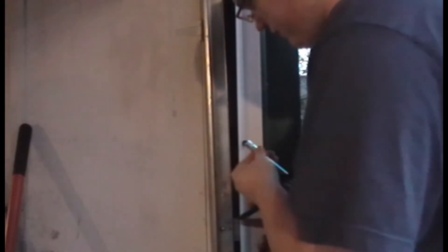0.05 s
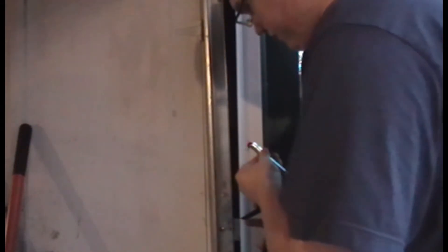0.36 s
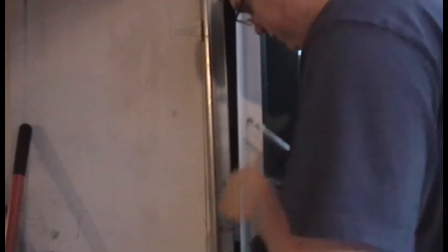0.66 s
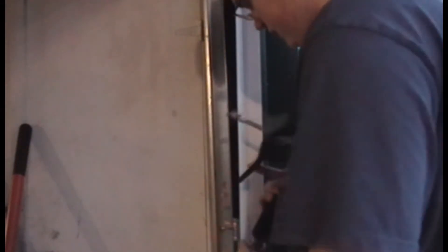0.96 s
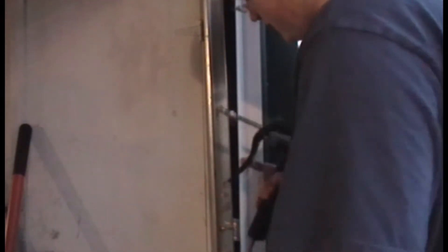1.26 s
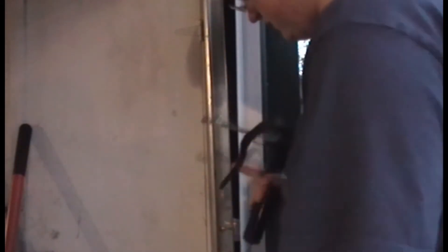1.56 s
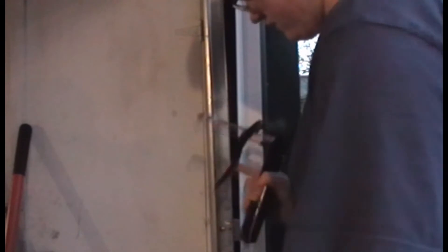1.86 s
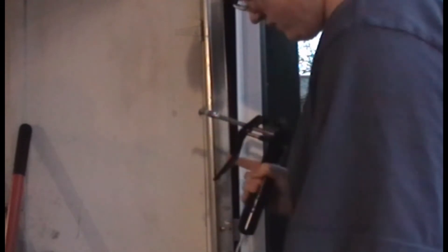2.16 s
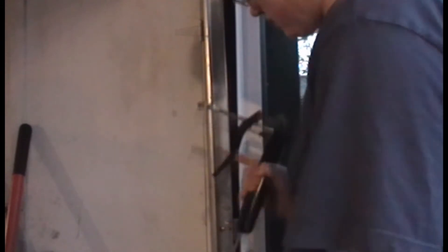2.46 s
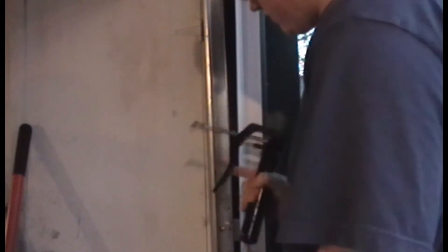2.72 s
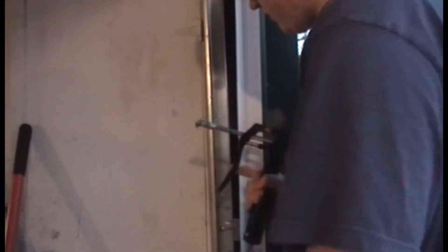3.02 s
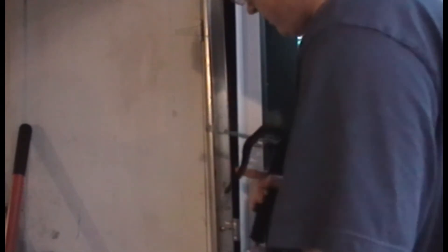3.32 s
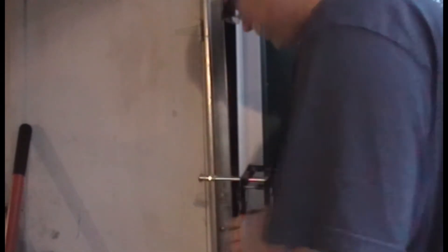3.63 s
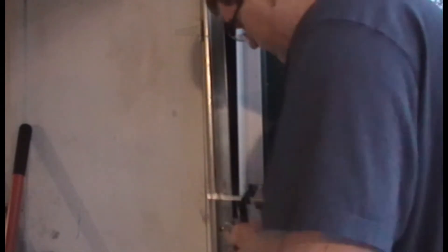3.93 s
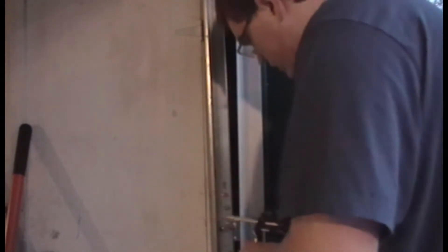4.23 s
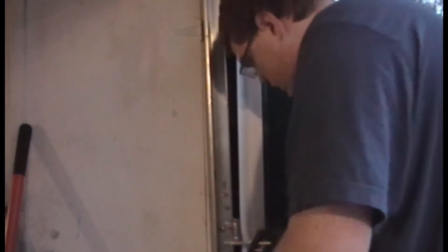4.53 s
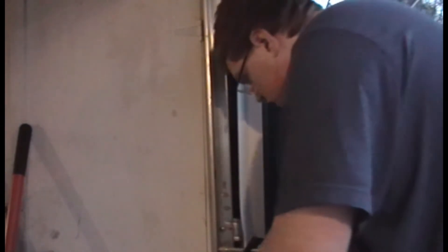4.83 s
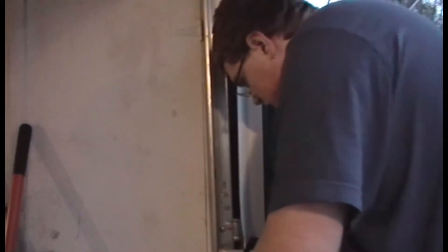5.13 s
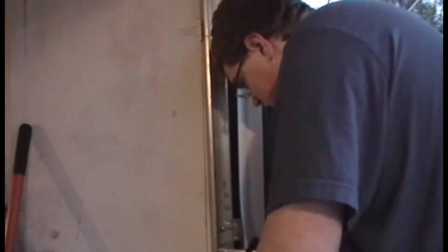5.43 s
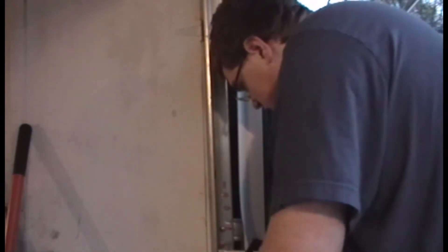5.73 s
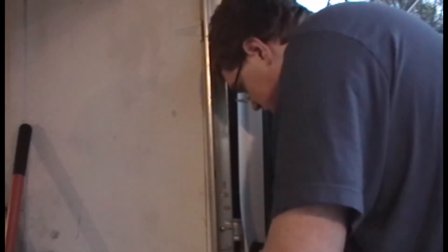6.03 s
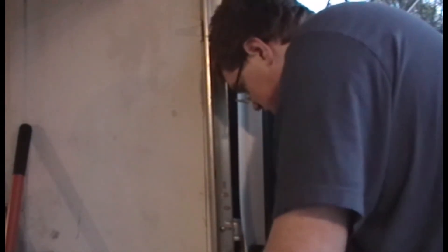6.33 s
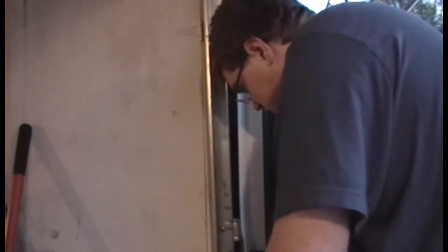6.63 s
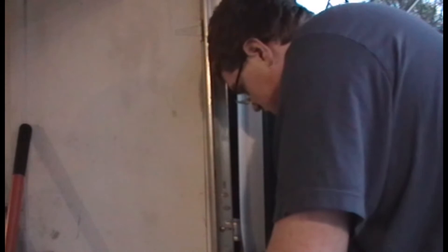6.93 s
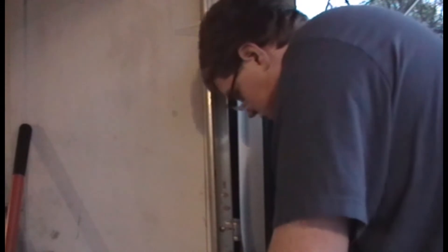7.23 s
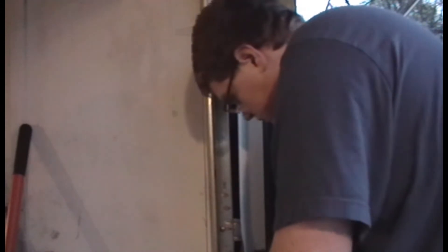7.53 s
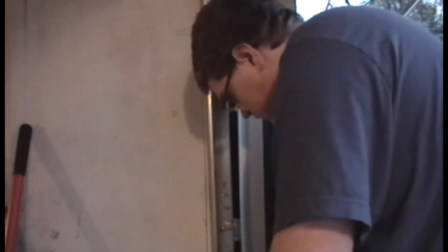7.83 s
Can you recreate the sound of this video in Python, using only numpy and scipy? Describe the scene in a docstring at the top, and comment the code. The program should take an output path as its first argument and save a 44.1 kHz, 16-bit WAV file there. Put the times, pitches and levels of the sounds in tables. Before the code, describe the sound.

A low, slightly wavering hum with a thin hiss fills a garage throughout. Just before 1 second a hand grease gun gives two faint ticks. From 1.2 to 3.3 seconds it is pumped about ten times, faster in the second half: each squeeze is a short spring scrape, a dull piston knock and a sharp steel click. The loudest clicks fall near 1.6, 2.6, 2.9 and 3.3 seconds. At 3.7 seconds a hand slides softly along the barrel. From 4 to about 7.5 seconds the nozzle rubs quietly in short turns on a door hinge. It knocks and rattles there at 4.7 seconds, several times more lightly between 5.3 and 6.5, and hardest at 6.9, briefly ringing the steel track. These knocks are softer than the clicks. The tool sounds are fairly close, with a short echo. A bird outside chirps faintly now and then.

```python
"""A low hum fills a garage throughout; a bird chirps faintly outside now and then.
From 0.8 s a pistol-grip grease gun clicks and is pumped: each squeeze scrapes its spring,
knocks the piston and ends in a sharp steel click. At 3.7 s a hand slides along the barrel.
From 4 s the lowered nozzle rubs, then knocks and rattles, on a hinge by the steel door track."""
import sys
import numpy as np
from scipy import signal
from scipy.fft import rfft, irfft, next_fast_len
from scipy.io import wavfile
from scipy.ndimage import uniform_filter1d, minimum_filter1d, map_coordinates

SR = 44100
rng = np.random.default_rng(int(sys.argv[2]) if len(sys.argv) > 2 else 0)


def master_out(mix):
    """Clip the mix to full scale and print it as 16-bit PCM to the path in sys.argv[1]."""
    frames = np.transpose(np.atleast_2d(mix))
    ceiling = np.clip(frames, -1, 1)
    pcm = np.round(ceiling * 32767).astype(np.int16)
    wavfile.write(sys.argv[1], SR, pcm)


N = 347067

# Levels are relative. Hum envelope: t/s, low band/dB, upper band/dB
HUM_LEVELS = [(0, -18.5, -26.5), (.6, -15.5, -25.5), (1.15, -18, -23), (1.4, -22, -28.5),
              (2.55, -21.5, -26), (2.72, -19, -27.5), (3.45, -25, -31), (4.0, -18, -22.5), (4.85, -17, -25),
              (5.1, -22, -26.5), (5.65, -20.5, -28), (6.5, -16.5, -24), (7.07, -21, -30.5),
              (7.3, -17.5, -28), (7.87, -21.5, -28)]
# tones in the hum: f/Hz, level against their band/dB
HUM_TONES = [(93, -21), (167, -11.5), (284, -11.5)]
# hiss envelope: t/s, level/dB
HISS_LEVELS = [(0, -50), (1.15, -49), (1.4, -53), (3.5, -53), (4.0, -48), (6.8, -49.5), (7.15, -55.5),
               (7.87, -53.5)]
# bird calls: t/s, f/Hz, level/dB
CHIRPS = [(.07, 3860, -48), (1.02, 3750, -46), (3.94, 3920, -42), (6.229, 3950, -38.5), (7.48, 3830, -44),
          (7.57, 3780, -46), (7.70, 3790, -51)]
# lever snaps: t/s, level/dB, treble/dB, body/dB
LEVER_SNAPS = [(.800, -41.5, -16, -5), (0.921, -34.5, -23, 9.5), (1.2513, -16, 16.5, -17),
               (1.281, -29, -3.5, 15), (1.6084, -0.5, -2.5, -6), (1.9106, -17, 9, -5),
               (1.932, -13.5, -5.5, 2), (2.333, -5.5, -5.5, -6), (2.4737, -11, 5, -2),
               (2.5, -22.5, -12.5, 12.5), (2.62, 1, 3, -4), (2.8036, -20.5, 9.5, 7), (2.825, -13, -8.5, -5),
               (2.9391, 0, 1, -5), (3.1249, -21, 6.5, -1), (3.1414, -20.5, -4.5, 1), (3.268, 2.5, -2.5, -8)]
# lever squeezes: top-speed t/s, rise/s, level/dB, top-speed resonance f/Hz
STROKES = [(1.23, 0.08, -19.5, 3220), (1.561, 0.093, -25.5, 3074), (1.882, 0.08, -22, 3200),
           (2.28, 0.069, -20, 3206), (2.448, 0.061, -18.5, 3340), (2.592, 0.064, -20.5, 3450),
           (2.775, 0.074, -21, 3490), (2.903, 0.052, -22, 3180), (3.092, 0.074, -25.5, 3027),
           (3.238, 0.064, -22.5, 3370)]
# nozzle turns: hardest t/s, length/s, level/dB
NOZZLE_TURNS = [(4.056, 0.065, -43.5), (5.1, 0.156, -54.5), (5.263, 0.085, -41), (5.454, 0.027, -45),
                (5.878, 0.15, -47.5), (5.954, 0.026, -38.5), (6.185, 0.027, -45), (6.24, 0.048, -63),
                (6.34, 0.31, -44), (6.57, 0.1, -41), (6.637, 0.056, -36), (7.427, 0.17, -40)]
# nozzle hits: t/s, level/dB, thud/dB, treble/dB, hinge ring/dB
NOZZLE_HITS = [(4.737, -15, 6, -9, -16), (4.746, -20.5, 4, -11, -34), (4.777, -24.5, 7, -16.5, -30),
               (4.885, -26.5, -10, 2.5, -58), (5.029, -40.5, -17, 8, -26), (5.312, -31, -2, 3, -46),
               (5.48, -19.5, -19, -3, -28), (5.493, -33, -13, -2, -30), (5.658, -34.5, 3, -5, -25),
               (5.678, -27.5, 1.5, 0, -4.5), (6.099, -31, -1, 4, -15), (6.113, -26.5, -1, -1, -2.5),
               (6.348, -30.5, -4, -5, -29), (6.483, -25.5, -21, 5, -28), (6.498, -19.5, 2.5, -13, -23),
               (6.882, -22, -19.5, -1, -29), (6.894, -12, -6.5, 0.5, -30), (6.903, -16, 1.5, -6, -17)]
# source spectra: f/Hz, level/dB
HUM_SPECTRUM = [(25, -41.5), (80, -34), (91, -19), (101, -10), (137, -0.5), (170, 0.5), (205, -3.5),
                (255, -8), (300, -8), (355, -24.5), (395, -18.5), (600, -28), (1300, -50), (3000, -67.5)]
HISS_SPECTRUM = [(300, -15.5), (1100, -1.5), (1700, 5), (2700, 3), (3900, 5), (5200, -2), (6500, -3.5),
                 (8000, -23.5), (11000, -14.5), (15000, -25), (16500, -22.5)]
CLICK_SPECTRUM = [(300, -27), (1100, -28.5), (2000, -18), (2600, -5.5), (3400, -15), (4150, 3),
                  (5000, -10.5), (6000, -1.5), (7000, -13), (8400, -21.5), (10500, -12), (13500, -20.5),
                  (15500, -29), (16600, -46)]
SCRAPE_SPECTRUM = [(250, -29), (470, 8.5), (800, -4), (1300, -23), (2000, -7), (2600, -16.5), (4200, 13),
                   (5000, 2.5), (6200, 5.5), (8000, -15.5), (11000, -11), (14000, -19), (16500, -40.5)]
SLIDE_SPECTRUM = [(1200, -20.5), (2700, -1), (4000, 2.5), (5700, 3), (8000, -22.5), (10000, -16),
                  (11800, -7.5), (13200, -15), (16000, -27)]
RUB_SPECTRUM = [(900, -9.5), (2000, -7.5), (3000, 6), (4200, 1.5), (6200, 1), (8000, -11), (11500, -10.5),
                (14000, -17), (16500, -29)]
KNOCK_SPECTRUM = [(100, -12), (300, 6), (600, -4), (1100, -14.5), (1900, -6.5), (2900, 4), (4500, 0),
                  (6300, -2), (8000, -15), (11000, -17), (16000, -34.5)]
# modes of gun, door track, hinge and door panel: f/Hz, level/dB, t60/s
GUN_MODES = [(2230, -11.5, .03), (4250, -16.5, 0.04), (4340, 0.5, 0.049), (5493, 8, .03), (6000, 4, .03),
             (5700, 3.5, .04), (6630, -9, 0.089), (10600, -9, .025)]
TRACK_MODES = [(1760, -9, .2), (1930, -31, 0.13), (2030, -13, 0.088), (2556, -10, 0.27), (2900, -8, .22),
               (2907, -6, 0.43), (3130, -13.5, 0.18), (3610, -2, 0.23), (4100, 1.5, 0.16),
               (4610, 9.5, 0.071)]
HINGE_MODES = [(1380, -1, .11), (1480, 2, 0.095), (2840, 7, 0.04), (3200, -16, 0.09), (4120, 8, 0.062),
               (4200, 4.5, .1), (10300, -21, .12)]
PANEL_MODES = [(331.4, 0.5, .25), (895, -7, .14)]
# stereo width: f/Hz, side level/dB
SIDE_SPECTRUM = [(30, -10.5), (80, -23.5), (170, -18), (350, -14.5), (700, -9), (1400, -7.5), (3000, -10.5),
                 (6000, -13), (9000, -14.5), (14000, -3.5)]
# room decay: f/Hz, t60/s
GARAGE_T60 = [(200, 0.86), (1500, 0.33), (4500, 0.31), (8000, 0.26), (15000, 0.18)]

PISTON_LAG_S = 0.011  # after top lever speed


def amp(db):
    """Decibels to gain."""
    return 10 ** (np.asarray(db) / 20)


def unit(x):
    """Scale to rms 1."""
    return x / np.sqrt(np.mean(x ** 2) + 1e-20)


def along(points, hz):
    """(f/Hz, value) points read on a log axis."""
    f, v = np.transpose(points)
    return np.interp(np.log(hz + 1), np.log(f + 1), v)


def curves(rows):
    """One value per sample for each column after the time."""
    s, *cols = np.transpose(rows)
    return [np.interp(np.arange(N) / SR, s, c) for c in cols]


def wobble(rate_hz):
    """Smooth random curve, rate_hz knots a second."""
    knots = rng.standard_normal(int(N * rate_hz / SR) + 4)
    return map_coordinates(knots, [np.arange(N) * rate_hz / SR])


def shaped(x, gain):
    """Zero-phase filter; gain is a function of frequency."""
    n = x.shape[-1]
    m = next_fast_len(n + 8192)
    return irfft(rfft(x, m) * gain(np.fft.rfftfreq(m, 1 / SR)), m)[..., :n]


def coloured(x, spectrum):
    """x filtered by a spectrum, at rms 1."""
    return unit(shaped(x, lambda hz: amp(along(spectrum, hz))))


def spread(pair):
    """Two unrelated signals as mid and side of a diffuse sound."""
    side = shaped(pair[1], lambda hz: amp(along(SIDE_SPECTRUM, hz)))
    return np.array([pair[0] + side, pair[0] - side])


def shelved(x, low_db, high_db, low_hz, high_hz):
    """x through a bass shelf and a treble shelf."""
    bass_db = lambda hz: low_db / (1 + (hz / low_hz) ** 8)
    treble_db = lambda hz: high_db * (1 - 1 / (1 + (hz / high_hz) ** 8))
    return shaped(x, lambda hz: amp(bass_db(hz) + treble_db(hz)))


def ring(modes, t):
    """Decaying modes, struck at new strengths every time."""
    strengths_db = rng.normal(0, 2, len(modes))
    return sum(amp(db + strike_db - 60 * t / t60_s) * np.sin(2 * np.pi * (hz * t + rng.random()))
               for (hz, db, t60_s), strike_db in zip(modes, strengths_db))


def add(track, s, sound):
    """Mix a sound into a track at time s."""
    part = track[..., round(s * SR):][..., :sound.shape[-1]]
    part += sound[..., :part.shape[-1]]


def slips(rate_hz, scatter_db):
    """Friction: tiny random impulses of uneven size."""
    impulses = (rng.random(N) < rate_hz / SR) * rng.standard_normal(N)
    return unit(impulses * amp(scatter_db * rng.standard_normal(N)))


def hum():
    """Low rumble, three wavering tones that swell with it, and thin hiss."""
    split_hz, sway_db, drift, tone_swell = 220, 2, 0.01799, 1.4
    low_db, upper_db = curves(HUM_LEVELS)
    rumble = spread(coloured(rng.standard_normal((2, N)), HUM_SPECTRUM))
    low = shaped(rumble, lambda hz: 1 / (1 + (hz / split_hz) ** 12))
    out = amp(low_db - 1) * unit(low) + amp(upper_db - 1.82) * unit(rumble - low)
    rise_db = np.interp(np.arange(N) / SR, [3.35, 3.85], [0, 6])
    for hz, db in HUM_TONES:
        band_db = low_db if hz < split_hz else upper_db
        tone_db = db + rise_db + band_db.mean() + tone_swell * (band_db - band_db.mean())
        phase = 2 * np.pi * np.cumsum(hz * (1 + drift * wobble(7))) / SR
        out += amp(tone_db) * unit(amp(sway_db * wobble(8)) * np.sin(phase))
    hiss_db, = curves(HISS_LEVELS)
    return out + amp(hiss_db) * spread(coloured(rng.standard_normal((2, N)), HISS_SPECTRUM))


def bird():
    """Short whistles, slightly arched in pitch."""
    out, length_s = np.zeros(N), .06
    u = np.linspace(-1, 1, round(length_s * SR))
    for s, hz, db in CHIRPS:
        phase = 2 * np.pi * np.cumsum(hz * (1 - 0.049 * u ** 2)) / SR
        add(out, s - length_s / 2, amp(db) * np.cos(u * np.pi / 2) ** 2 * np.sin(phase))
    return out


def gun_clicks():
    """Steel on steel: crack, bright edge, short ring. Lever sharp, piston dull; the grip detunes each."""
    out, t = np.zeros((2, N)), np.arange(SR // 5) / SR
    lead_samples, burst_t60_s, edge_t60_s, attack_s = 256, 0.046, .007, 0.00029
    piston_knocks = [(s + PISTON_LAG_S, db - 1, -15.5, 6.5) for s, _, db, _ in STROKES]
    for s, db, treble_db, body_db in LEVER_SNAPS + piston_knocks:
        detune = 1 + .03 * rng.standard_normal()
        burst = rng.standard_normal((2, len(t))) * amp(-60 * t / burst_t60_s)
        edge = np.diff(rng.standard_normal((2, len(t) + 1))) * amp(-60 * t / edge_t60_s)
        contact = np.pad(amp(-1) * burst + amp(0.5) * edge, [(0, 0), (lead_samples, 0)])
        crack = spread(shaped(contact, lambda hz: amp(along(CLICK_SPECTRUM, hz / detune))))
        ping = ring(GUN_MODES, t * detune) * (1 - np.exp(-t / attack_s))
        snap = crack + amp(-28.5) * np.pad(ping, (lead_samples, 0))
        snap = shelved(snap, body_db, treble_db, low_hz=3000, high_hz=8500)
        add(out, s - lead_samples / SR, amp(db + 10.5) * snap)
    return out


def spring_scrape():
    """The spring scrapes; its resonance climbs with lever speed and sinks as the lever stops."""
    t = np.arange(N) / SR
    level, rasp, climb_hz = np.zeros((3, N))
    rest_hz, braking_s, swell_db = 2460, .06, 18.5
    for fastest_s, rise_s, db, top_hz in STROKES:
        speed = np.interp(t, [fastest_s - rise_s, fastest_s, fastest_s + braking_s], [0, 1, 0])
        climb_hz += (top_hz - rest_hz) * speed ** 2
        rasp += speed
        level += amp(db - swell_db * (1 - speed) ** 1.4) * np.minimum(speed * 6, 1)
    scrape = coloured(slips(rate_hz=6000, scatter_db=2.5), SCRAPE_SPECTRUM)
    phase = 2 * np.pi * np.cumsum(rest_hz + climb_hz) / SR
    resonance = unit(wobble(950) * np.sin(phase) + wobble(950) * np.cos(phase))
    judder = amp(1.9 * wobble(260))
    return level * judder * (amp(-4.5) * scrape * (.5 + .5 * rasp) + amp(-6) * resonance)


def barrel_thumps():
    """Each piston knock shakes the barrel softly."""
    out, t = np.zeros(N), np.arange(SR // 5) / SR
    mean_hz, t60_s = 444, 0.078
    for s, _, db, _ in STROKES:
        hz = mean_hz * (1 + .1 * rng.standard_normal())
        envelope = amp(db - 4 - 60 * t / t60_s) * (1 - np.exp(-t * hz))
        add(out, s + PISTON_LAG_S, envelope * np.sin(2 * np.pi * hz * t))
    return out


def hand_slide():
    """A hand slides along the barrel: one swell of friction noise."""
    t = np.arange(N) / SR
    full_speed_s, hold_s, rise_db_per_s, fall_db_per_s = 3.705, 0.14, 143, 100
    fade_in_db = rise_db_per_s * np.maximum(full_speed_s - t, 0)
    fade_out_db = fall_db_per_s * np.maximum(t - full_speed_s - hold_s, 0)
    return amp(-37 - fade_in_db - fade_out_db) * coloured(rng.standard_normal(N), SLIDE_SPECTRUM)


def nozzle_rubs():
    """The nozzle is worked onto its fitting in short turns; the track sings faintly."""
    t = np.arange(N) / SR
    edge_db, rest_from_s, rest_to_s = 11, 4.74, 6.9
    pressure = sum(amp(db - edge_db * np.abs(2 * (t - s) / length_s) ** 1.34)
                   for s, length_s, db in NOZZLE_TURNS)
    pressure += amp(-57) * ((t > rest_from_s) & (t < rest_to_s))  # grates while resting on the hinge
    grip = amp(2.2 * wobble(35))
    rub = pressure * grip * coloured(slips(rate_hz=16000, scatter_db=4), RUB_SPECTRUM)
    track = ring(TRACK_MODES, np.arange(SR // 2) / SR)
    return rub + amp(-13.5) * signal.fftconvolve(rub, track / np.linalg.norm(track))[:N]


def nozzle_knocks():
    """The nozzle hits loose hardware, which chatters and rings track, hinge and door panel."""
    out, t = np.zeros(N), np.arange(SR // 2) / SR
    chatter_t60_s, attack_s = 0.082, 0.0014
    for s, db, thud_db, treble_db, hinge_db in NOZZLE_HITS:
        chatter = rng.standard_normal(len(t)) * amp(1.2 * wobble(600)[:len(t)])
        chatter = coloured(chatter, KNOCK_SPECTRUM)
        chatter = shelved(chatter, thud_db, treble_db, low_hz=2200, high_hz=7200)
        track = amp(-16) * ring(TRACK_MODES, t)
        hinge = amp(hinge_db - 2.5) * ring(HINGE_MODES, t)
        panel = amp(thud_db - 16.5) * ring(PANEL_MODES, t)
        blow = chatter * amp(-60 * t / chatter_t60_s) + track + hinge + panel
        add(out, s, amp(db + 2.5) * blow * (1 - np.exp(-t / attack_s)))
    return out


def garage(x, build_s):
    """Room reverb: builds up, dies soonest in the treble; a new tail every 0.5 s as the gun moves."""
    out, step = np.zeros((2, N)), SR // 2
    for first in range(0, N, step):
        hz, t, noise = signal.stft(rng.standard_normal((2, SR // 2)), SR, nperseg=256)
        envelope = amp(-60 * t / along(GARAGE_T60, hz)[:, None]) * (1 - np.exp(-t / build_s))
        tail = signal.istft(noise * envelope, SR, nperseg=256)[1]
        tail /= np.linalg.norm(tail[0])
        add(out, first / SR, signal.fftconvolve(x[None, first:first + step], tail, axes=1))
    return spread(out)


def scene():
    """Gun, door hardware and bird, each with garage reverb, over the hum."""
    clicks = gun_clicks()
    squeezes = spring_scrape() + barrel_thumps()
    handling = nozzle_knocks() + hand_slide() + nozzle_rubs()
    chirps = bird()
    gun_send = amp(-8.5) * clicks.mean(axis=0) + amp(-13.5) * squeezes
    gun = clicks + squeezes + garage(gun_send, build_s=0.0031)
    hardware = handling + amp(-6) * garage(handling, build_s=0.0014)
    outside = chirps + amp(-3) * garage(chirps, build_s=.02)
    pan_right = amp([[-.4], [.4]])
    return (gun + hardware) * pan_right + outside + hum()


def record(dry):
    """A limiter ducks peaks above full scale; the top band is cut."""
    recovery_db_per_s, window_samples, top_hz = 55, 61, 16500
    over_db = np.maximum(20 * np.log10(np.abs(dry).max(axis=0) + 1e-9), 0)
    ramp_db = recovery_db_per_s * np.arange(N) / SR
    gain_db = ramp_db - np.maximum.accumulate(over_db + ramp_db)
    gain_db = uniform_filter1d(minimum_filter1d(gain_db, window_samples), window_samples)  # look-ahead
    return shaped(dry * amp(gain_db), lambda hz: hz < top_hz)


dry = scene()
out = record(dry)
master_out(out)
```